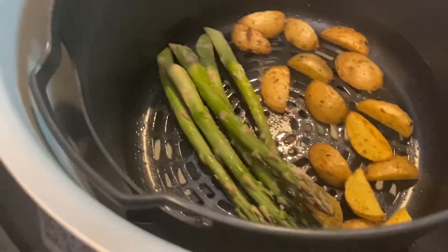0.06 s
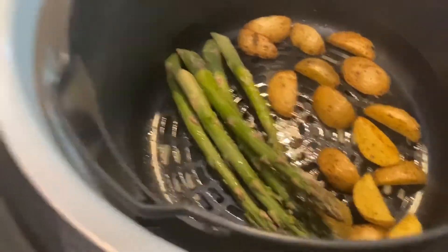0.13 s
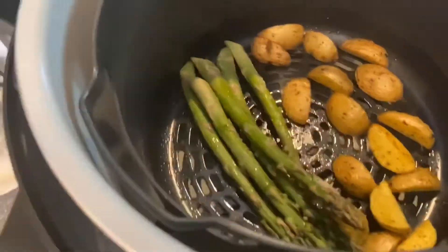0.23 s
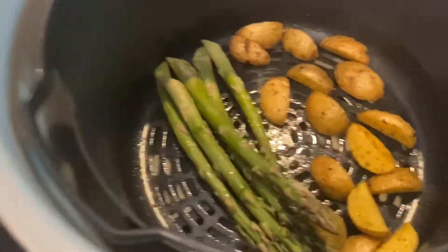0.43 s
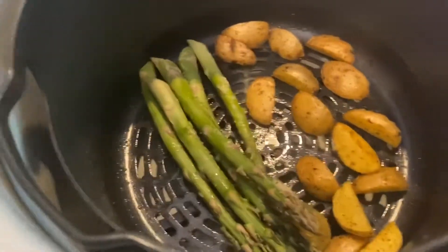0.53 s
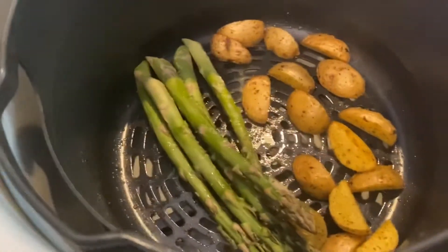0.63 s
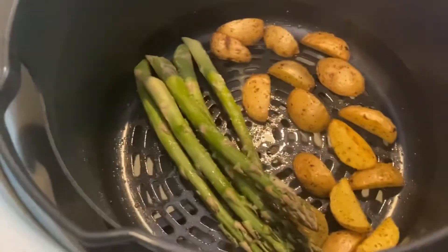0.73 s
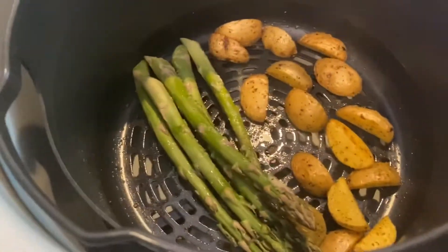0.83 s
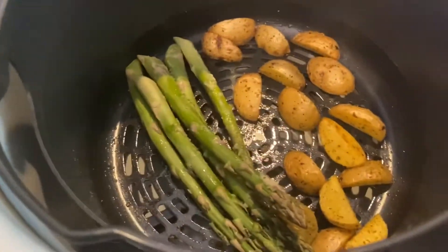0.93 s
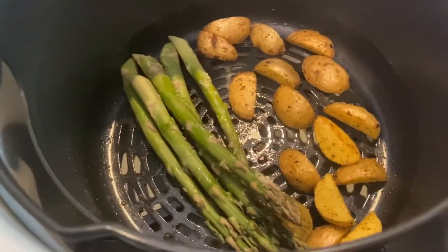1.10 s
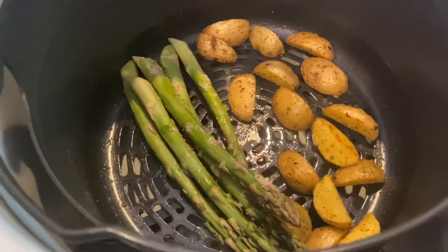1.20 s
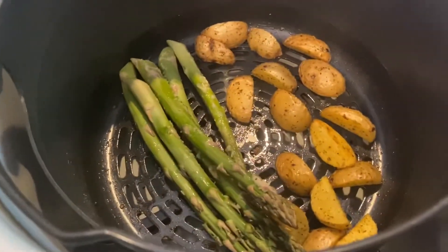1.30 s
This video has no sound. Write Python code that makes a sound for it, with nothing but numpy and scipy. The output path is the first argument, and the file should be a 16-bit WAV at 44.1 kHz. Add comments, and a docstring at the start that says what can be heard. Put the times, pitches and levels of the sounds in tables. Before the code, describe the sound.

One sharp, hollow knock sounds near the microphone as a cooker part settles into place, and the pot rings briefly. Faint sizzling, a few tiny spits of oil and a low motor hum carry on in the quiet kitchen.

```python
"""Knock on an open countertop cooker.

Close by in a quiet kitchen, a motor hums, bubbles sizzle softly on hot food and oil spits a few times.
A hard part chatters against the housing, which thuds; the part seats with a hollow knock and a small
rebound. The pot rings briefly and the room reverberates."""
import sys
import numpy as np
from scipy import signal
from scipy.fft import rfft, irfft
from scipy.io import wavfile
from scipy.ndimage import uniform_filter1d

SR = 44100
rng = np.random.default_rng(int(sys.argv[2]) if len(sys.argv) > 2 else 0)


def waveform_to_disk(signal):
    """Save audio, clipped to [-1, 1], as 16-bit WAV at the path in sys.argv[1]."""
    frames = np.transpose(np.atleast_2d(signal))
    scaled = np.clip(frames, -1, 1) * 32767
    samples = np.round(scaled).astype(np.int16)
    wavfile.write(sys.argv[1], SR, samples)


N = 59535

# Diffuse sound. Each row: frequency in Hz, left-right correlation.
STEREO_CORRELATION = [(100, 0.65), (220, 0.71), (400, .45), (800, -0.4), (2400, 0.18), (8000, 0.16)]
# Kitchen air. Each row: frequency in Hz, relative density in dB.
AIR_SPECTRUM = [(25, -38), (50, 0), (95, -3), (170, -2), (230, -9), (390, -12), (480, -7.5), (720, -18),
                (1050, -16.5), (1300, -18), (1620, -14.5), (1850, -20), (2150, -19), (3200, -26.5),
                (5200, -28), (7300, -40), (11000, -88), (16000, -42)]
# Motor hum. Each row: frequency in Hz, rms level in dB.
HUM_LINES = [(58.6, -44.5), (118.4, -57.5), (174, -53.5), (295, -59.5), (452, -61.5), (517, -69),
             (1034, -70), (1556, -70), (2126, -69.5)]
# Sizzling food. Each row: frequency in Hz, relative density in dB.
SIZZLE_SPECTRUM = [(2500, -22), (5000, -15), (6200, -1), (7300, 4), (8800, -5.5), (11000, 3.5), (13000, -1),
                   (14200, 4), (16000, -7)]
# Oil spits. Each row: start in seconds, level in dB.
SPIT_EVENTS = [(0.1547, -29), (0.3323, -31), (0.4303, -22.5), (0.5093, -32), (0.8563, -38)]
# One spit. Each row: frequency in Hz, relative density in dB.
SPIT_SPECTRUM = [(1500, -27), (4000, 0), (7000, 1), (11000, 2.5), (16000, -0.5)]
# First touches of the part. Each row: start in seconds, level in dB.
CHATTER_TOUCHES = [(0.2094, -17.5), (0.2103, -11.5), (0.2120, -12.5), (0.2132, -18)]
# Ring of the part. Each row: frequency in Hz, relative level in dB, T60 in seconds.
HARD_PART_MODES = [(960, -17, .03), (1441, -22.5, 0.19), (1673, -20, 0.12), (1890, -27, 0.079),
                   (2062, -8.5, 0.024), (2542, -21.5, 0.04), (2750, -11, 0.031), (3390, -15.5, 0.012),
                   (4960, -12, 0.017), (5880, -17.5, 0.014), (7090, -18.5, 0.016)]
# Scrape between touches. Each row: frequency in Hz, relative density in dB.
SCRAPE_SPECTRUM = [(250, -18), (450, -2), (800, 1), (2000, -11), (3000, 6), (4800, -1), (7500, -4),
                   (9000, -20), (16000, -7)]
# Housing swings. Each row: start in seconds, frequency in Hz, level in dB, rise in seconds.
HOUSING_THUDS = [(0.2098, 400, -27, .0055), (0.2131, 182, -13, .0062), (0.2152, 98, -16, .0115),
                 (0.2440, 180, -26, .012), (0.2552, 88, -25, .018)]
# Kitchen reverberation. Each row: frequency in Hz, relative density in dB.
ROOM_SPECTRUM = [(50, -16), (110, 7), (340, 3), (800, 2), (1300, -7.5), (2100, -9.5), (4000, -16.5),
                 (7000, -22.5), (11000, -33), (16000, -33)]
# Seating and rebound. Each row: start in seconds, knock level in dB, crack level in dB.
KNOCK_EVENTS = [(0.2255, -7.5, -14.5), (0.2480, -18.5, -39)]
# Crack of a knock. Each row: frequency in Hz, relative density in dB.
CRACK_SPECTRUM = [(500, 11.5), (1300, 4.5), (3000, -6.5), (5000, 2), (8000, -7), (11000, -1.5),
                  (16000, -15)]
# Ring of pot and housing. Each row: frequency in Hz, level in dB, T60 in seconds.
COOKER_MODES = [(97, -31, .27), (119, -26, .28), (174, -30, .3), (202, -31, .31), (246, -33, .28),
                (268, -33, .22), (382, -44, .3), (445, -37, .25), (543, -36, .23), (680, -34, .25),
                (816, -34, .2), (861, -34, .22), (1037, -41, .18), (1128, -38, .2)]


def undb(db):
    """Decibels to gain."""
    return 10 ** (np.asarray(db) / 20)


def since(start_s):
    """Seconds since the start, zero before it."""
    return np.maximum(np.arange(N) / SR - start_s, 0)


def pan(left_minus_right_db):
    """Left and right gains."""
    return undb(np.array([[left_minus_right_db], [-left_minus_right_db]]) / 2)


def per_bin(points):
    """Table interpolated over log frequency at each FFT bin."""
    hz, value = np.array(points, float).T
    bin_hz = np.arange(N // 2 + 1) * SR / N
    return np.interp(np.log(bin_hz + 1), np.log(hz), value)


def diffuse(spectrum):
    """Coloured stereo noise, rms 1, sides alike in the bass."""
    correlation = np.clip(per_bin(STEREO_CORRELATION), -1, 1)
    coloured = rfft(rng.standard_normal((2, N))) * undb(per_bin(spectrum))
    mid, side = coloured * np.sqrt([1 + correlation, 1 - correlation])
    noise = irfft(np.array([mid + side, mid - side]), N)
    return noise / noise.std()


def wander(rate_hz):
    """Slow random curve, spread near 1."""
    hold = int(SR / rate_hz)
    steps = np.repeat(rng.standard_normal(N // hold + 1), hold)
    return uniform_filter1d(steps, hold)[:N]


def decay(t, t60_s):
    """Exponential decay, silent until t > 0."""
    return (t > 0) * np.exp(-np.log(1000) * t / t60_s)


def bump(t, rise_s):
    """Envelope peaking at rise_s, dying about as fast."""
    return (t / rise_s * np.exp(1 - t / rise_s)) ** 4


def swing(t, hz, rise_s):
    """Heavily damped oscillation of a few cycles."""
    return bump(t, rise_s) * np.sin(2 * np.pi * hz * t)


def ring(t, modes, detune=0):
    """Decaying modes of a struck object."""
    shifts = 1 + detune * rng.standard_normal(len(modes))
    return sum(undb(db) * decay(t, t60_s) * np.sin(2 * np.pi * hz * shift * t)
               for (hz, db, t60_s), shift in zip(modes, shifts))


def from_pot(treble, lag_s=.000224):
    """Treble from the pot reaches the left microphone later, in opposite phase."""
    bin_hz = np.arange(N // 2 + 1) * SR / N
    delayed = irfft(rfft(treble) * np.exp(-2j * np.pi * bin_hz * lag_s), N)
    return np.array([-delayed, treble])


def kitchen_air(level_db=-44.5):
    """Steady, diffuse air noise."""
    return undb(level_db) * diffuse(AIR_SPECTRUM)


def motor_hum(fundamental_drift_hz=.15, waver_db=3):
    """Appliance motor: all lines drift in pitch, the upper ones also waver in level."""
    out = 0
    for line, (hz, db) in enumerate(HUM_LINES):
        drift_hz = fundamental_drift_hz * hz / HUM_LINES[0][0] * wander(rate_hz=12.2)
        phase = 2 * np.pi * (np.cumsum(hz + drift_hz) / SR + rng.random())
        rms_db = db + (line > 0) * waver_db * wander(rate_hz=21)
        out += np.sqrt(2) * undb(rms_db) * np.sin(phase)
    return out


def sizzle(level_db=-54.5, bubbles_per_s=12000, scatter_db=0.5):
    """Tiny bubbles burst on the food and merge into hiss."""
    bursting = rng.random(N) < bubbles_per_s / SR
    sizes = undb(scatter_db * rng.exponential(size=N))
    bursts = bursting * sizes * rng.standard_normal(N)
    hiss = irfft(rfft(bursts) * undb(per_bin(SIZZLE_SPECTRUM)), N)
    return undb(level_db) * from_pot(hiss / hiss.std())


def oil_spits(echo_db=-13):
    """Single drops of oil spit and echo in the pot."""
    echo = undb(echo_db) * diffuse(SPIT_SPECTRUM)
    out = 0
    for start_s, db in SPIT_EVENTS:
        t = since(start_s)
        burst = bump(t, rise_s=.0003) * diffuse(SPIT_SPECTRUM)[0]
        out += undb(db) * (from_pot(burst) + echo * decay(t, t60_s=.022))
    return out


def part_chatter(low_cut_hz=830, scrape_db=-12, pan_db=6):
    """The hard part, too small to radiate bass, touches and scrapes; each side differs slightly."""
    sides, scrape = np.zeros((2, 2, N))
    for start_s, db in CHATTER_TOUCHES:
        t = since(start_s)
        for side in sides:
            side += undb(db) * ring(t, HARD_PART_MODES, detune=0.014)
        scrape += undb(db + scrape_db) * decay(t, t60_s=0.021) * diffuse(SCRAPE_SPECTRUM)
    low_cut = signal.butter(2, low_cut_hz, "high", fs=SR, output="sos")
    return pan(pan_db) * (signal.sosfilt(low_cut, sides) + scrape)


def housing_thuds(pan_db=2):
    """The housing gives way inwards and rocks back."""
    thuds = sum(undb(db) * swing(since(start_s), hz, rise_s)
                for start_s, hz, db, rise_s in HOUSING_THUDS)
    return -pan(pan_db) * thuds


def reverberation(level_db=-26, chatter_boost_db=4.5, late_db=-16.5, build_s=0.0018):
    """The kitchen answers chatter and knock with a short tail and a faint longer one."""
    out = 0
    for start_s, db in [(CHATTER_TOUCHES[1][0], chatter_boost_db), (KNOCK_EVENTS[0][0], 0)]:
        t = since(start_s)
        build = 1 - np.exp(-t / build_s)
        tail = decay(t, t60_s=0.25) + undb(late_db) * decay(t, t60_s=0.76)
        out += undb(db) * diffuse(ROOM_SPECTRUM) * build * tail
    return undb(level_db) * out


def seating_knock(pan_db=-3):
    """The part seats and rebounds, each a hollow knock with a bright crack."""
    crack = diffuse(CRACK_SPECTRUM)
    out = 0
    for start_s, knock_db, crack_db in KNOCK_EVENTS:
        t = since(start_s)
        out += undb(knock_db) * pan(pan_db) * swing(t, hz=850, rise_s=.0019)
        out += undb(crack_db) * bump(t, rise_s=0.0009) * crack
    return out


def pot_ring():
    """Pot and housing ring on after the first knock."""
    return ring(since(KNOCK_EVENTS[0][0]), COOKER_MODES)


def scene(kitchen_pan_db=-0.5):
    """All sources at the microphones, in stereo."""
    kitchen = pan(kitchen_pan_db) * (kitchen_air() + motor_hum())
    food = sizzle() + oil_spits()
    impact = part_chatter() + housing_thuds() + reverberation() + seating_knock() + pot_ring()
    return kitchen + food + impact


def record(dry, low_cut_hz=38, high_cut_hz=16200):
    """The microphones lose the deepest bass; the recorder cuts the top."""
    low_cut = signal.butter(4, low_cut_hz, "high", fs=SR, output="sos")
    high_cut = signal.ellip(8, .2, 80, high_cut_hz, fs=SR, output="sos")
    return signal.sosfilt(high_cut, signal.sosfilt(low_cut, dry))


dry = scene()
out = record(dry)
waveform_to_disk(out)
```